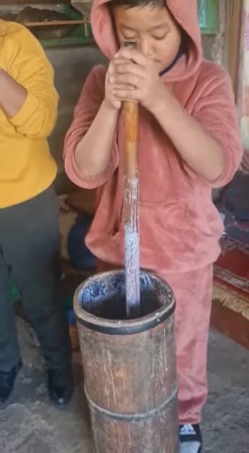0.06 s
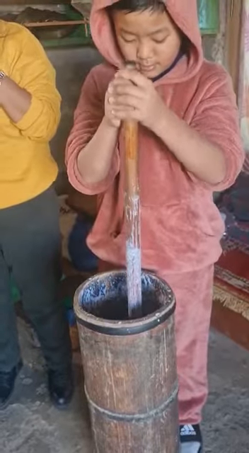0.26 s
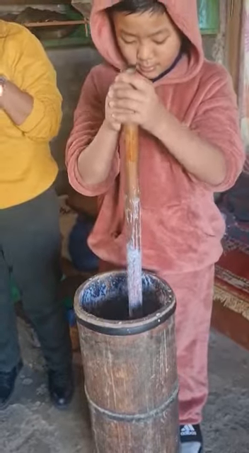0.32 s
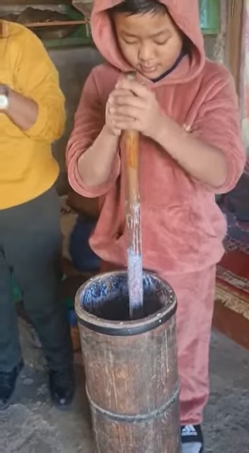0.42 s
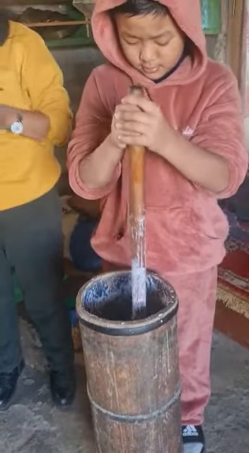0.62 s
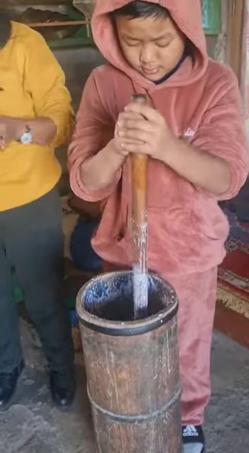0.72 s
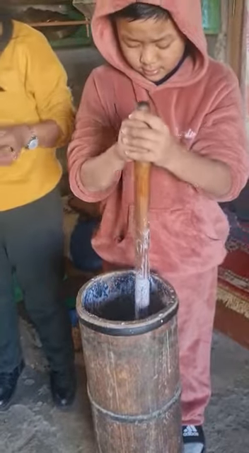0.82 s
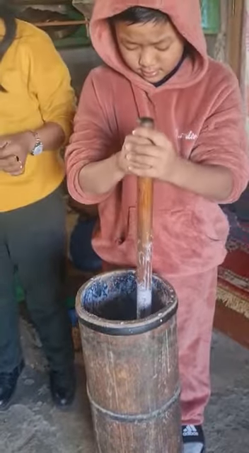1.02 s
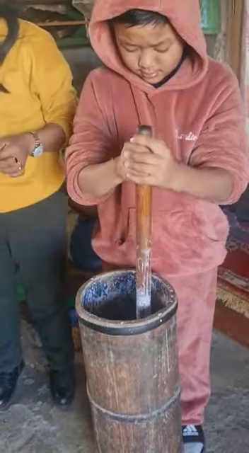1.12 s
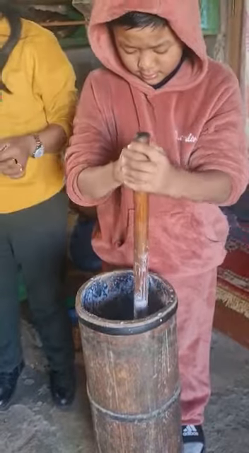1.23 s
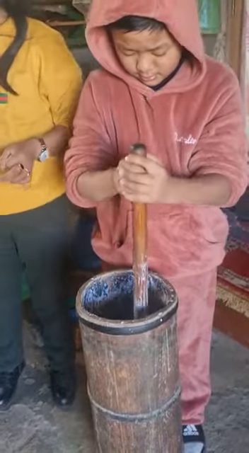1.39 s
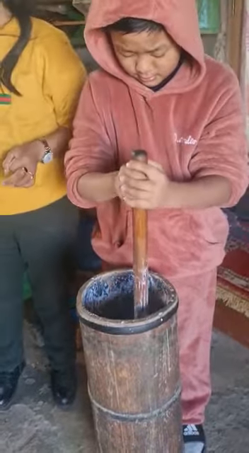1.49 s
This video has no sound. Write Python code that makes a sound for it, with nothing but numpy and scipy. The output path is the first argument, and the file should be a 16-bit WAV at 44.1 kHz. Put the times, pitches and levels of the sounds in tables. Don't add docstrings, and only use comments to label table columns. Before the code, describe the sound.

Wooden churn plunger thuds low and hollow, then liquid gurgles while foam fizzes, squelches and pops.

```python
import sys
import numpy as np
from scipy import signal
from scipy.fft import rfft, irfft, next_fast_len
from scipy.io import wavfile
from scipy.ndimage import uniform_filter1d

SR = 44100
rng = np.random.default_rng(int(sys.argv[2]) if len(sys.argv) > 2 else 0)


def boost_factor(decibels):
    exponent = np.asarray(decibels, float) / 20
    return 10 ** exponent


def materialize(psi):
    bounded = np.clip(np.atleast_2d(psi).T, -1, 1)
    quanta = np.round(bounded * 32767).astype(np.int16)
    wavfile.write(sys.argv[1], SR, quanta)


N = 68355

# start_s, blow_db, air_column_db and stave_crack_db (both beside the blow), column_pitch_hz
BUMPS = [(0.217, -39.5, -21, -26.5, 124), (0.2365, -12, -0.5, -58, 100.3),
         (0.292, -49.5, 28.5, -3.5, 103.8), (0.305, -30.5, -25, -26.5, 109), (0.339, -26, -2, -19, 123.7),
         (0.36, -41.5, -4, -48, 107), (0.444, -38, -6, -43, 107), (0.521, -26.5, -33, -34, 133),
         (0.545, -34.5, 7, -26, 113), (0.736, -59.5, 30, 3.5, 135.7), (0.792, -28.5, -1.5, -20, 116),
         (0.84, -42, 16, -26, 131.6), (0.951, -35.5, 13.5, -30.5, 124.5), (1.017, -32.5, -19, -33, 119),
         (1.076, -37, 16.5, -66, 124.3), (1.1, -40, 3, -30.5, 140.6), (1.2289, -26.5, 16, -10.5, 123.6),
         (1.317, -35, 7, -27, 127.4), (1.345, -41.5, 21.5, -44, 134), (1.417, -33, 5, -56, 123),
         (1.435, -38, 17.5, -40, 122.8), (1.508, -34, 9.5, -35, 130.4)]
# pitch_hz, level_db, fade_by_60_db_s
WALL = [(157.8, -18, 0.33), (202.34, -1, 0.13), (225.2, 4, 0.087), (274.2, -3.5, 0.14), (327.1, -10, 0.16),
        (385, -16.5, 0.21)]
COLUMN = [(97, -4, .15), (125, 0, .18)]
STAVE = [(440, -10, .06), (520, -12, .05), (600, -3, .045), (690, 0, .045), (780, -3, .045), (880, -6, .04),
         (970, -6, .04), (1080, -7, .04), (1220, -7, .035), (1450, -18, .03), (1900, -22, .03),
         (2500, -26, .025)]
BLOW_S, CRACK_S = 0.0016, 0.0016
SCATTER_DB, CRACK_DB, COLUMN_DB = 4.5, 6, -14.5
COLUMN_T60_S = 0.24
WALL_RISE_S, STAVE_RISE_S, COLUMN_RISE_S = 0.0038, 0.00055, 0.009
STAVE_DETUNE = 0.05

KNOCK_S, KNOCK_DB, KNOCK_TAIL_S, KNOCK_HZ = 1.2295, -36.5, 0.019, 317
KNOCK_EDGE_DB, KNOCK_LOW_HZ, KNOCK_TOP_HZ = -49.5, 1100, 4500
# start_s, level_db, pitch_hz, fade_by_60_db_s
TAPS = [(.2385, -47.5, 656, 0.08), (.3385, -32, 617, 0.041), (.3385, -27, 842, 0.02),
        (.339, -36, 1193, 0.033), (.529, -49, 760, 0.049), (0.9517, -47, 345, 0.056),
        (1.018, -52.5, 720, .1), (1.03, -51.5, 385, .15), (.790, -42.5, 1140, .06),
        (.951, -52.5, 655, 0.054), (1.2305, -27.5, 293.3, 0.099), (1.234, -42, 1068, 0.12),
        (1.25, -41, 980, 0.059), (1.274, -46.5, 700, 0.054), (1.317, -51, 760, 0.045),
        (1.421, -52.5, 774, 0.027), (1.5091, -42, 328, 0.063), (1.5095, -53.5, 520, 0.036)]

# time_s, gurgle_db, deep_surge_db, stave_rub_db (beside the gurgle)
FLOW = [(0, -90, -84, -10), (.2, -84, -84, -10), (.25, -55, -58, -20), (.4, -50, -60, -16),
        (.46, -48, -72, -7), (.62, -49, -55, -6), (.65, -52, -58, -11), (.675, -64, -57, -7),
        (.78, -55, -68, -12), (.86, -62, -78, -18), (.93, -74, -82, -14), (1.05, -60, -84, -18),
        (1.21, -72, -86, -14), (1.27, -56, -76, -12), (1.4, -60, -74, -20), (1.55, -66, -72, -20)]
SURGE_HZ, SURGE_WIDTH_HZ = 62.5, 2.9
GURGLE_PER_S, GURGLE_SPREAD_DB, GURGLE_COLUMN_DB = 600, 2, -5

# time_s, fizz_db, squelch_db, fizz_tilt_db_per_octave
FOAM = [(0, -80.5, -94, -22), (.11, -65.5, -80.5, -15.5), (.16, -60.5, -74.5, 1.5), (.21, -54, -67.5, -5.5),
        (.31, -58.5, -87.5, -15.5), (.345, -74, -71.5, -12), (.385, -72.5, -84, -11), (.4, -66, -71, -3),
        (.455, -100, -63, -13), (.48, -63.5, -67, -14), (.53, -58, -62, -12), (.6, -57, -54, -12.5),
        (.66, -54.5, -54.5, -16.5), (.76, -55, -61.5, -13), (.84, -54, -74.5, -10), (.9, -90, -90, -16),
        (1.07, -80, -107, -29), (1.26, -86, -74, -10), (1.285, -75, -79.5, -6), (1.36, -74, -82, -23),
        (1.45, -74.5, -81.5, -28.5), (1.55, -87.5, -95, -8)]
# pitch_hz, level_db
FIZZ = [(2500, -15.5), (3700, -11.5), (5200, -9.5), (6200, -10), (7100, 4.5), (10600, -1), (12000, 3.5),
        (16000, -1)]
FIZZ_PER_S, FIZZ_SPREAD_DB, FIZZ_PATCH_DB = 7000, 3, 3.2
# pitch_hz, width_hz, level_db
GAP = [(1890, 120, -3), (2010, 90, -3), (2220, 150, 1), (2470, 180, -4), (2950, 400, -8), (3550, 300, -10)]
GAP_SWELL_DB, GAP_SWELL_S = 2.8, 0.04
# time_s, level_db
SIZZLE = [(.02, -100), (.06, -66.5), (.125, -96), (.15, -53.5), (.168, -51), (.198, -59.5), (.215, -66),
          (.232, -72), (.255, -72), (.275, -88), (.385, -100), (.4, -59), (.46, -72), (.48, -86)]
# pitch_hz, width_hz, level_db
POCKETS = [(3300, 130, -13), (3950, 310, 5), (4350, 330, 2.5), (5000, 850, -2.5), (7200, 1330, -5.5)]
CLUMPS_PER_S, CLUMP_S = 260, 0.0012
# start_s, level_db, pitch_hz, snap_db (beside the bubble)
TICKS = [(0.055, -59, 3430, -6), (0.0863, -69.5, 3180, 9), (0.1372, -50, 4170, -11),
         (0.1523, -48, 3850, -5), (0.1632, -35, 3980, -10), (0.173, -47, 4270, -5.5),
         (0.2015, -32.5, 7530, 1), (0.2037, -39.5, 3620, -22), (0.235, -45.5, 5100, -1),
         (0.2433, -45, 4900, -8), (0.2690, -40, 7200, -22), (0.2836, -44, 7400, -28),
         (0.3937, -54, 3300, -7), (0.4040, -41, 3730, -29), (0.424, -31.5, 9390, -11),
         (0.432, -41.5, 3410, -12), (0.539, -60, 3050, -21), (0.6114, -48, 3440, -8),
         (0.6411, -37, 8000, -1.5), (0.7033, -40, 4200, -37), (0.727, -40, 3950, -19),
         (0.789, -45, 3620, -1), (1.0161, -68, 3400, -18), (1.0565, -57.5, 3530, -26),
         (1.0924, -65.5, 3054, -5.5), (1.1722, -67, 1960, -4), (1.184, -67, 2700, -6),
         (1.276, -53, 8150, -7), (1.286, -63, 8700, -2), (1.3189, -59.5, 3550, -5), (1.44, -59, 4320, -15)]
TICK_CYCLES, SNAP_S, SNAP_HZ = 11, 0.0013, 10900
# start_s, length_s, level_db, pitch_hz
LEAKS = [
    (0.041, 0.11, -68, 3300),
    (0.509, 0.19, -60, 6890),
    (1.046, 0.11, -77, 3350),
    (1.137, 0.22, -65.5, 1120),
    (1.426, .12, -78.5, 2485),
]
LEAK_WIDTH = 0.04

# pitch_hz, delay_s
BARREL_LAG = [(150, 0.00029), (400, 0.00025), (1000, 0.00046)]
FOAM_LAG = [(2000, 0.00041), (8000, 0.0003286)]
# pitch_hz, left_minus_right_db
BARREL_PAN = [(60, -1.5), (200, -1.5), (400, -8.5), (1000, -4)]
FOAM_PAN = [(3000, -4), (8000, -3.5), (12000, 0)]
MIC_LOW_HZ, MIC_TOP_HZ = 52, 15700
# pitch_hz, fade_by_60_db_s
ROOM_T60_S = [(100, 0.14), (500, 0.11), (1200, 0.085), (10000, 0.11)]
WET_DB, FOAM_WET_DB, TICK_WET_DB = -10.5, 0, -18
# pitch_hz, level_db
ROOM_TONE = [(18, -28), (45, -12), (70, -16), (200, -25), (350, -16), (780, -15), (2170, -25), (4530, -38),
             (16000, -39.5)]
ROOM_TONE_DB = -73.5


def evened(x):
    return x / np.sqrt(np.mean(x ** 2) + 1e-20)


def read(points, hz):
    f, value = np.transpose(points)
    return np.interp(np.log(hz + 1), np.log(f + 1), value)


def curve(table, column):
    rows = np.array(table)
    return boost_factor(np.interp(np.arange(N) / SR, rows[:, 0], rows[:, column]))


def add(mix, s, sound):
    part = mix[round(s * SR):][:len(sound)]
    part += sound[:len(part)]


def colour(x, gain):
    size = next_fast_len(N + 2048)
    return irfft(rfft(x, size) * gain(np.fft.rfftfreq(size, 1 / SR)), size)[..., :N]


def ring(modes, chance, rise_s, length=0.85):
    t = np.arange(round(length * SR)) / SR
    total = np.zeros(len(t))
    for (hz, db, t60), c in zip(modes, chance):
        total += boost_factor(db + SCATTER_DB * c - 60 * t / t60) * np.sin(2 * np.pi * hz * t)
    return (1 - np.exp(-t / rise_s)) ** 2 * total


def detuned(modes, chance):
    return [(hz * (1 + STAVE_DETUNE * c), db, t60) for (hz, db, t60), c in zip(modes, chance)]


def grains(per_s, spread_db):
    size = boost_factor(spread_db * np.minimum(rng.exponential(1, N), 5))
    return size * rng.choice([-1., 1.], N) * (rng.random(N) < per_s / SR)


def bumps():
    out = np.zeros(N)
    chance = rng.standard_normal((len(BUMPS), 1200))
    blow = np.hanning(round(BLOW_S * SR) + 2)
    fade = np.exp(-np.arange(1000) / SR / CRACK_S)
    for (s, db, column_db, stave_db, hz), c in zip(BUMPS, chance):
        air = ring([(hz, column_db + COLUMN_DB, COLUMN_T60_S)], [0], COLUMN_RISE_S)
        body = 0.5 * ring(WALL, c, WALL_RISE_S) + air
        rattle = abs(c[200:]) ** 2 * np.sign(c[200:]) * fade
        staves = ring(detuned(STAVE, c[40:]), c[16:], STAVE_RISE_S)
        crack = signal.fftconvolve(staves, rattle / np.linalg.norm(rattle))
        add(out, s, -boost_factor(db) * signal.fftconvolve(body, blow / blow.sum()))
        add(out, s, boost_factor(db + stave_db + CRACK_DB) * crack / abs(crack).max())
    return out


def knock():
    out = np.zeros(N)
    t = np.arange(5000) / SR
    chatter_noise, edge_noise = rng.standard_normal((2, 5000))
    modes = STAVE + [(KNOCK_HZ, 8., .07), (1.38 * KNOCK_HZ, -4., .08)]
    body = ring(modes, np.zeros(len(modes)), STAVE_RISE_S)
    chatter = signal.fftconvolve(chatter_noise * np.exp(-t / KNOCK_TAIL_S), body)[:len(body)]
    add(out, KNOCK_S, boost_factor(KNOCK_DB) * (chatter / abs(chatter).max() + body / abs(body).max()))
    band = signal.butter(5, [KNOCK_LOW_HZ, KNOCK_TOP_HZ], "band", fs=SR, output="sos")
    edge = signal.sosfilt(band, edge_noise + 20 * (t == t[20]))
    fade = np.exp(-t / 0.0019) + 0.038 * np.exp(-t / 0.041)
    add(out, KNOCK_S, boost_factor(KNOCK_EDGE_DB) * evened(edge) * np.minimum(t / 0.0016, 1) * fade)
    return out


def taps():
    out = np.zeros(N)
    for s, db, hz, t60 in TAPS:
        add(out, s, ring([(hz, db, t60)], [0], STAVE_RISE_S, 0.3))
    return out


def gurgle():
    out = np.zeros(N)
    parts = ((WALL, 1, WALL_RISE_S), (COLUMN, boost_factor(GURGLE_COLUMN_DB), COLUMN_RISE_S),
             (STAVE[:8], curve(FLOW, 3), STAVE_RISE_S))
    for modes, gain, rise_s in parts:
        slugs = grains(GURGLE_PER_S, GURGLE_SPREAD_DB)
        body = ring(modes, np.zeros(len(modes)), rise_s)
        thumps = signal.fftconvolve(slugs * gain * curve(FLOW, 1), body)[:N]
        out += thumps / np.linalg.norm(body) / slugs.std()
    surge = colour(rng.standard_normal(N), lambda hz: 1 / (1 + ((hz - SURGE_HZ) / SURGE_WIDTH_HZ * 2) ** 2))
    return out + evened(surge) * curve(FLOW, 2)


def fizz():
    bursts = colour(grains(FIZZ_PER_S, FIZZ_SPREAD_DB),
                    lambda hz: boost_factor(read(FIZZ, hz)) * hz ** 6 / (hz ** 6 + 2600. ** 6))
    hz, t, z = signal.stft(evened(bursts), SR, nperseg=256)
    patches = uniform_filter1d(rng.standard_normal(z.shape), size=4, axis=0)
    patches = evened(uniform_filter1d(patches, size=10, axis=1))
    rows = np.array(FOAM)
    octaves = np.log2(np.maximum(hz[:, None], 3500) / 6000)
    tilt_db = np.interp(t, rows[:, 0], rows[:, 3]) * octaves
    bursts = signal.istft(z * boost_factor(FIZZ_PATCH_DB * patches + tilt_db), nperseg=256)[1][:N]
    return bursts * curve(FOAM, 1)


def squelch():
    out = np.zeros(N)
    span = round(GAP_SWELL_S * SR)
    for f, w, db in GAP:
        swell = evened(uniform_filter1d(uniform_filter1d(rng.standard_normal(N), span), span))
        wet = colour(grains(2500, 3.5), lambda hz: 1 / (1 + 1.3j * (hz - f) / w) ** 2)
        out += boost_factor(db + GAP_SWELL_DB * swell) * wet
    return evened(out) * curve(FOAM, 2)


def sizzle():
    clump = np.hanning(round(2 * CLUMP_S * SR))
    clumps = 0.4 + evened(signal.fftconvolve(abs(grains(CLUMPS_PER_S, 3)), clump)[:N])

    def pockets(hz):
        return sum(boost_factor(db) / (1 + 1.3j * (hz - f) / w) ** 2 for f, w, db in POCKETS)

    return evened(colour(clumps * rng.standard_normal(N), pockets)) * curve(SIZZLE, 1)


def ticks():
    out, snaps = np.zeros(N), np.zeros(N)
    chance = rng.standard_normal((len(TICKS), 300))
    t = np.arange(300) / SR
    for (s, db, hz, snap_db), c in zip(TICKS, chance):
        u = t * hz / TICK_CYCLES * 3
        add(out, s, boost_factor(db) * u ** 2 * np.exp(2 - 2 * u) * np.sin(2 * np.pi * hz * t))
        add(snaps, s, boost_factor(db + snap_db) * c * np.exp(-(t / SNAP_S - 1.5) ** 2))
    return out + colour(snaps, lambda hz: 1.24 * np.exp(-2 * np.log(hz / SNAP_HZ + 1e-6) ** 2))


def leaks():
    out = np.zeros(N)
    for s, length, db, hz in LEAKS:
        air = colour(rng.standard_normal(N), lambda f: 1 / (1 + ((f - hz) / (LEAK_WIDTH * hz)) ** 4))
        shape = np.sqrt(np.hanning(round(length * SR)))
        add(out, s, boost_factor(db) * shape * evened(air)[:len(shape)])
    return out


def ports(x, lag, pan):
    left = colour(x, lambda hz: boost_factor(read(pan, hz) / 2))
    right = colour(x, lambda hz: boost_factor(-read(pan, hz) / 2) * np.exp(-2j * np.pi * hz * read(lag, hz)))
    return np.array([left, right])


def room(x):
    echoes = np.zeros((2, SR // 2))
    at = np.arange(200, SR // 2 - 20, 20) + rng.integers(0, 20, (2, 1092))
    np.put_along_axis(echoes, at, rng.choice([-1., 1.], at.shape), 1)
    hz, t, z = signal.stft(echoes, SR, nperseg=256)
    fade = boost_factor(-60 * t / read(ROOM_T60_S, hz)[:, None])
    tail = signal.istft(z * fade, SR, nperseg=256)[1]
    return signal.fftconvolve(x[None], tail / np.linalg.norm(tail[0]), axes=1)[:, :N]


def room_tone():
    a = rng.standard_normal((3, N))
    air = colour(a[:2] + 0.09 * a[2], lambda hz: boost_factor(read(ROOM_TONE, hz)))
    return boost_factor(ROOM_TONE_DB) * evened(air)


def scene():
    barrel = bumps() + knock() + taps() + gurgle()
    froth = fizz() + squelch() + sizzle()
    pops = ticks() + leaks()
    direct = ports(barrel, BARREL_LAG, BARREL_PAN) + ports(froth + pops, FOAM_LAG, FOAM_PAN)
    thin = colour(barrel, lambda hz: hz ** 4 / (hz ** 4 + 350. ** 4))
    echoed = boost_factor(WET_DB) * thin + boost_factor(FOAM_WET_DB) * froth + boost_factor(TICK_WET_DB) * pops
    return direct + room(echoed) + room_tone()


def top_cut(x):
    return signal.sosfilt(signal.butter(12, 16520, fs=SR, output="sos"), x)


def record(dry):
    high_pass = signal.butter(3, MIC_LOW_HZ, "high", fs=SR, output="sos")
    heard = colour(signal.sosfilt(high_pass, dry), lambda hz: 1 / (1 + (hz / MIC_TOP_HZ) ** 40))
    return top_cut(heard)


dry = scene()
out = record(dry)
materialize(out)
```